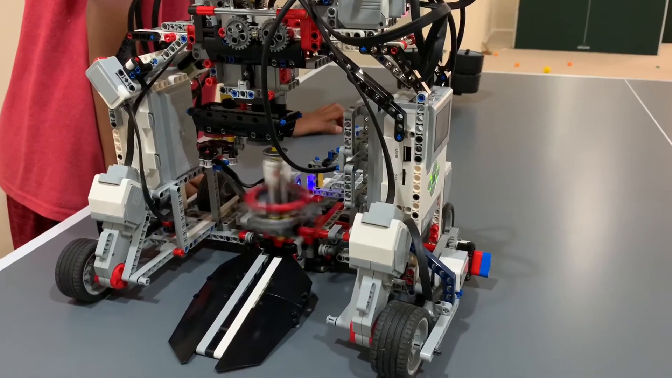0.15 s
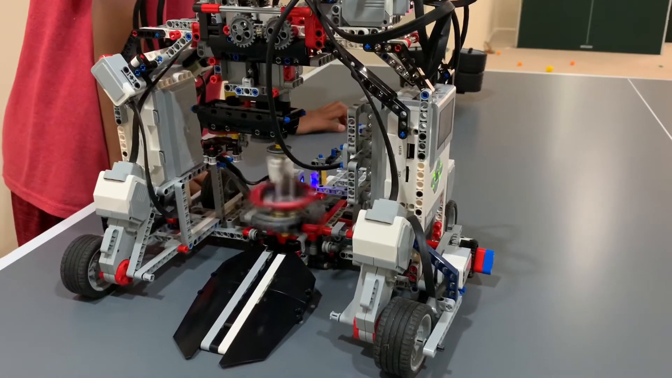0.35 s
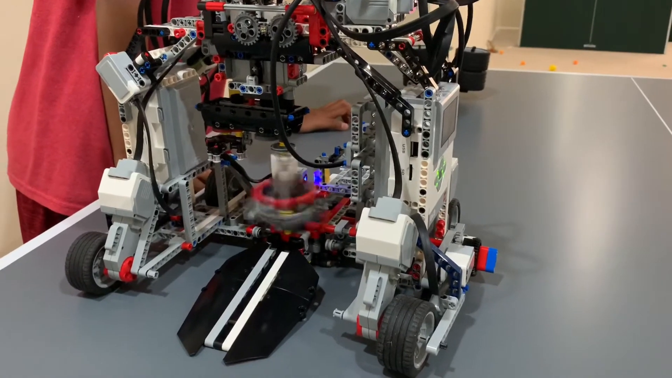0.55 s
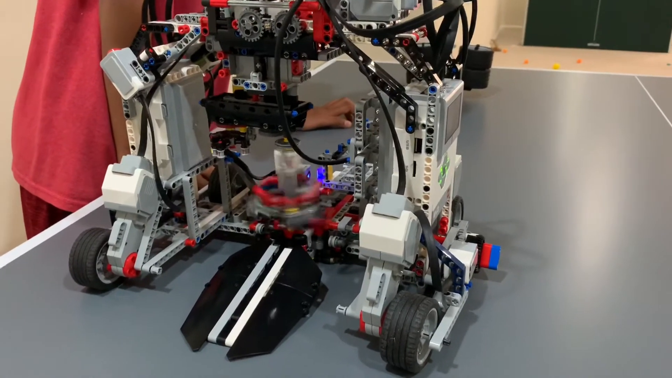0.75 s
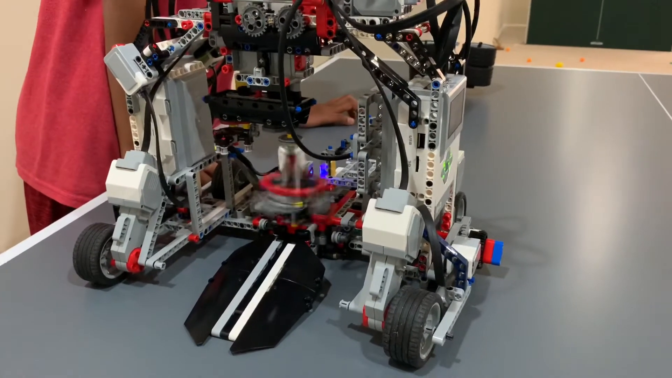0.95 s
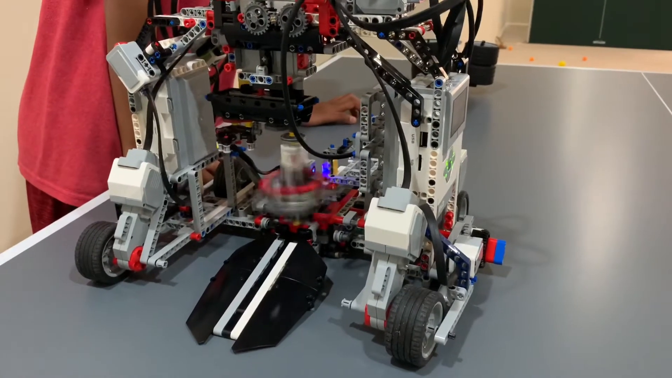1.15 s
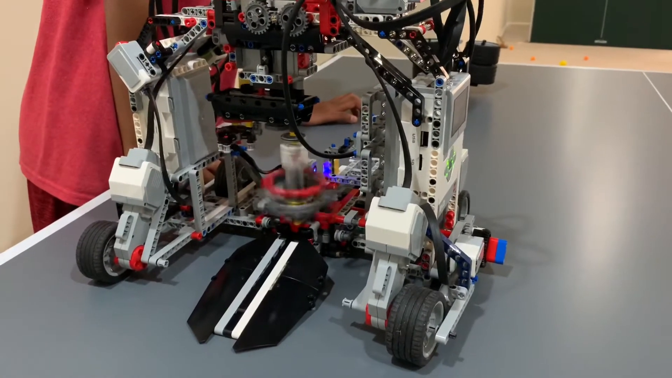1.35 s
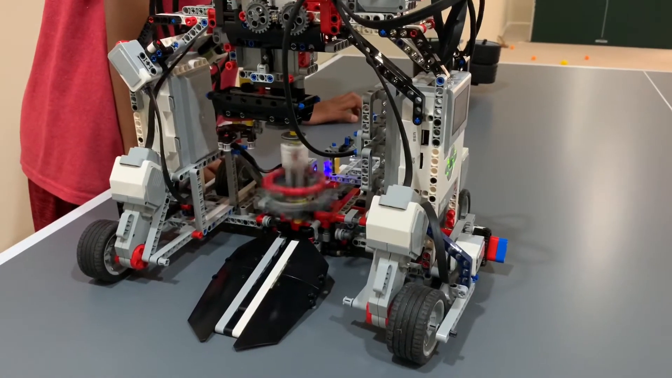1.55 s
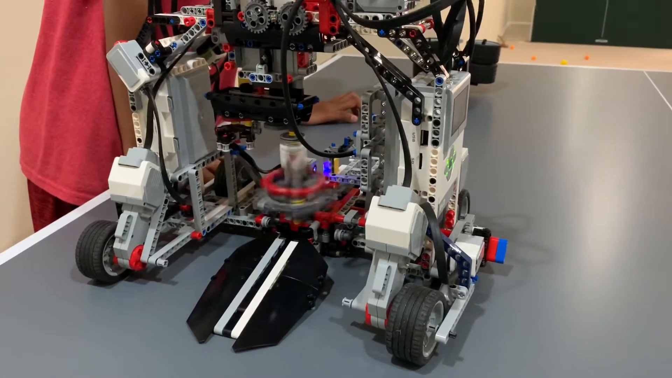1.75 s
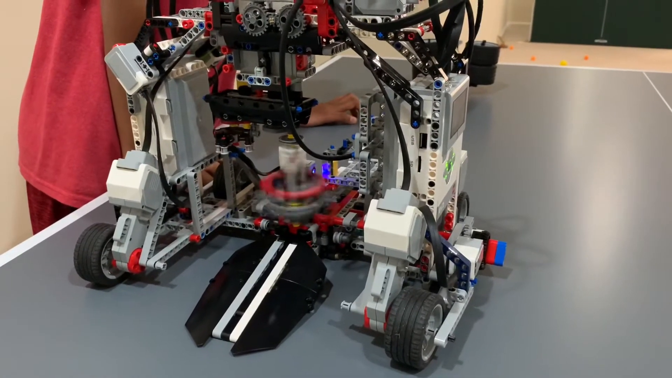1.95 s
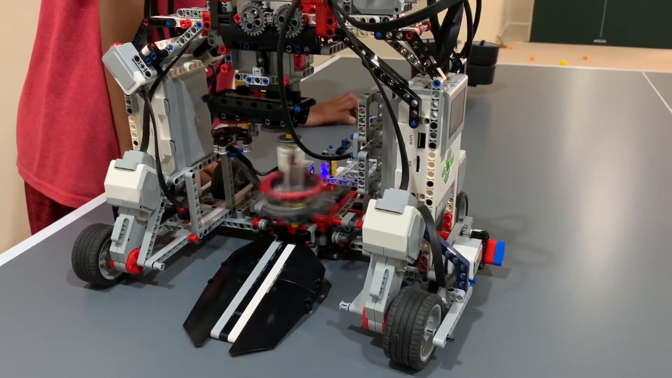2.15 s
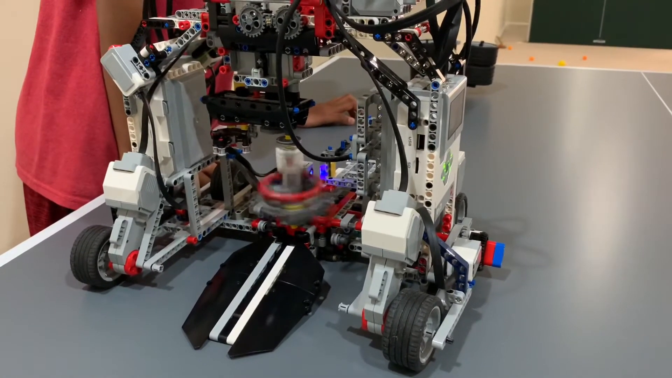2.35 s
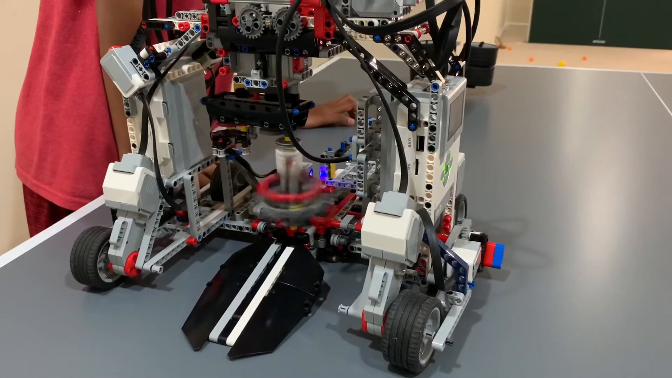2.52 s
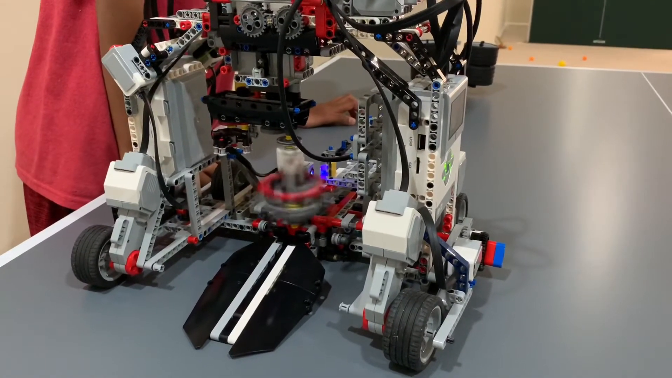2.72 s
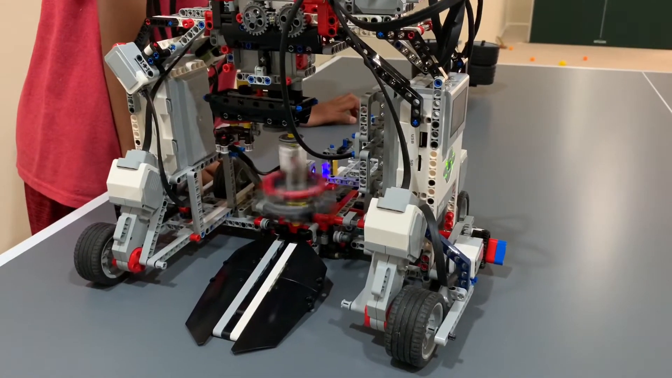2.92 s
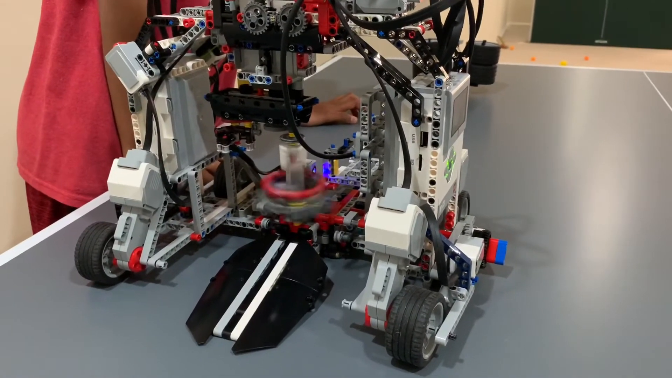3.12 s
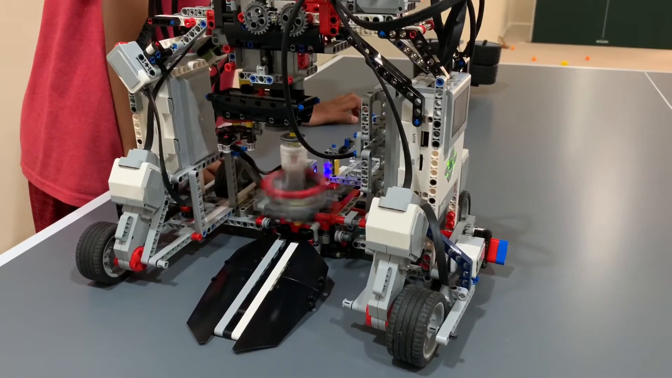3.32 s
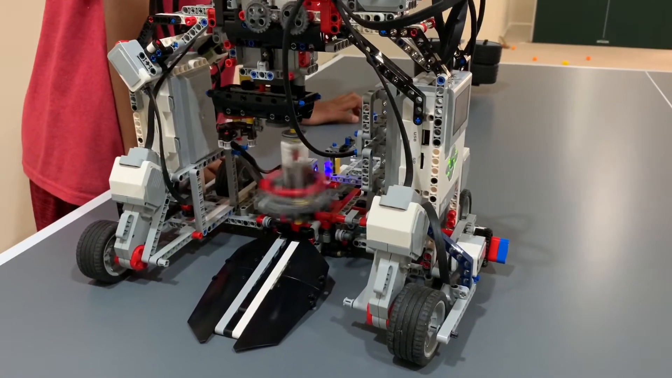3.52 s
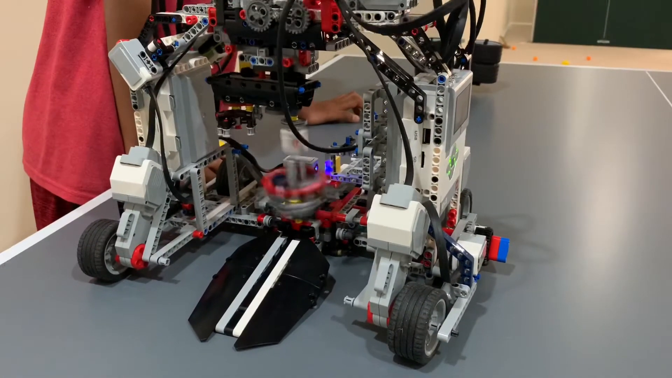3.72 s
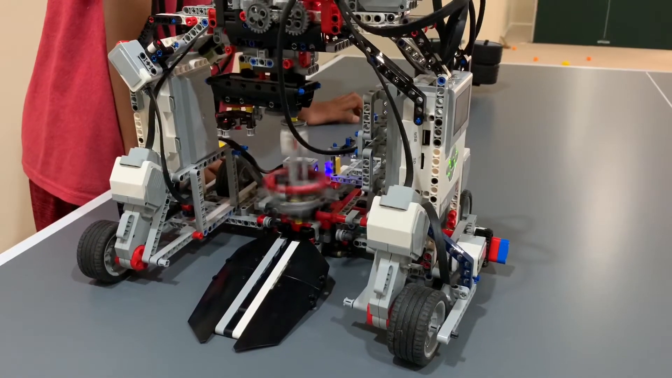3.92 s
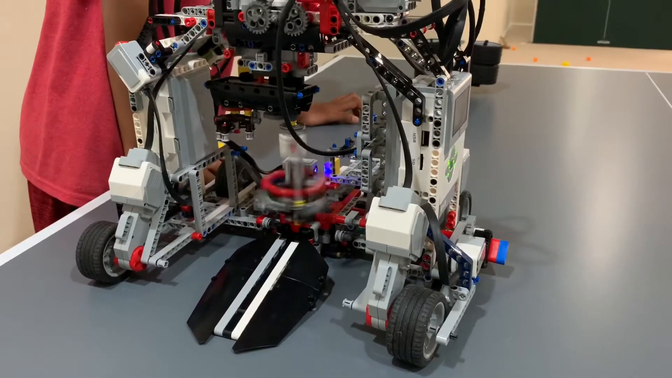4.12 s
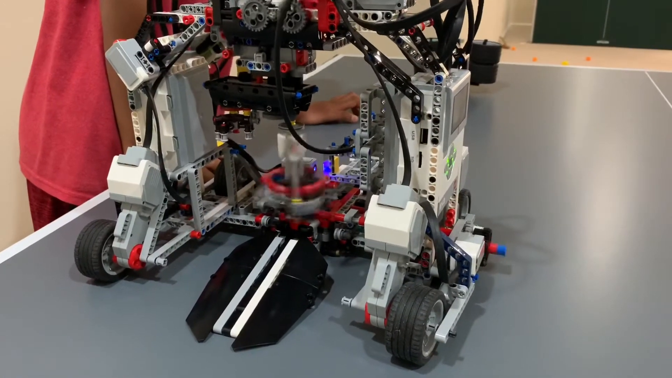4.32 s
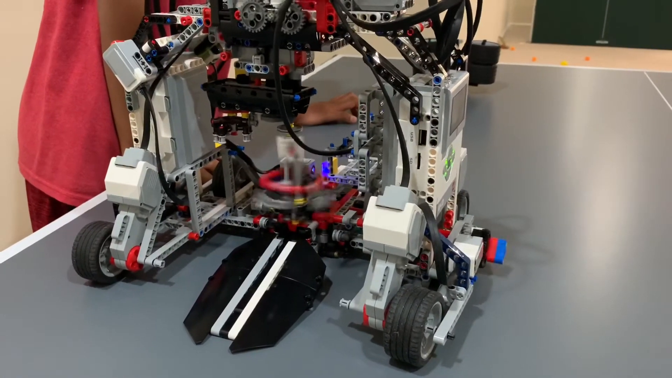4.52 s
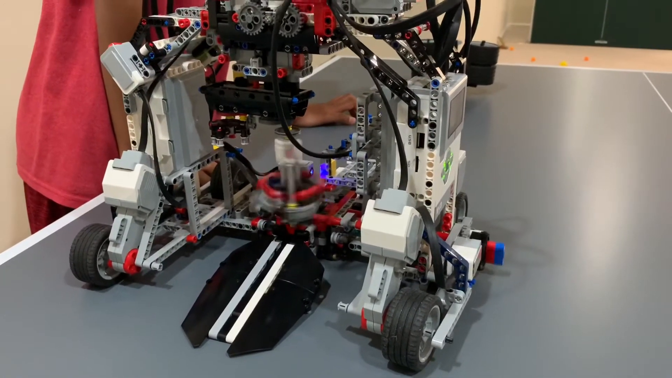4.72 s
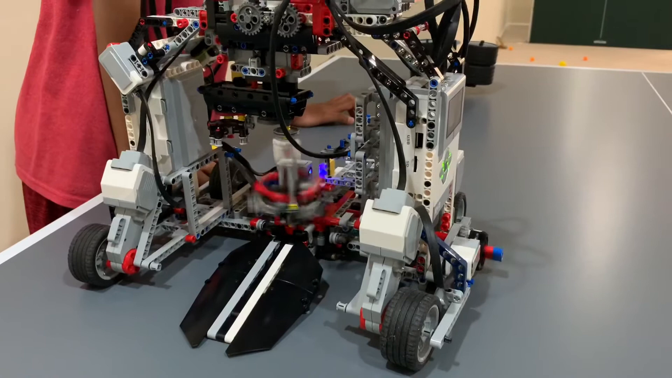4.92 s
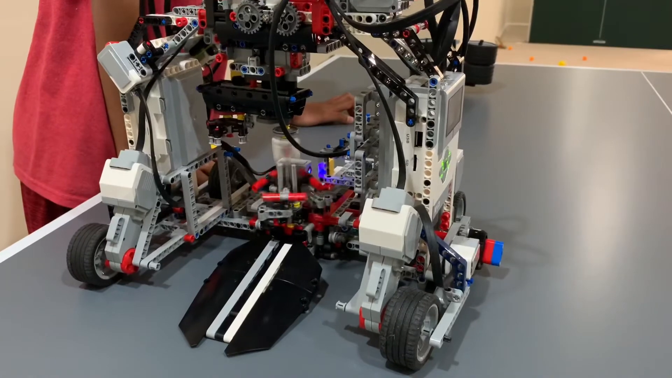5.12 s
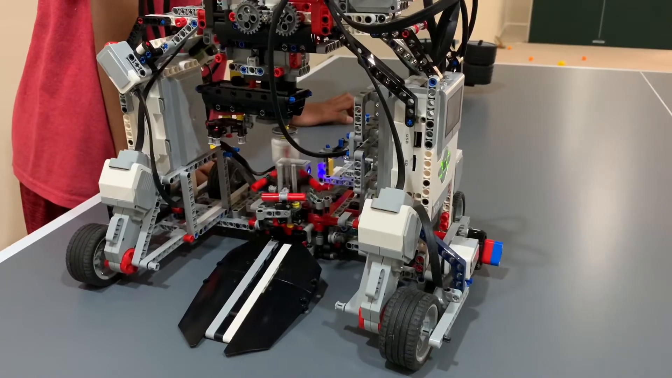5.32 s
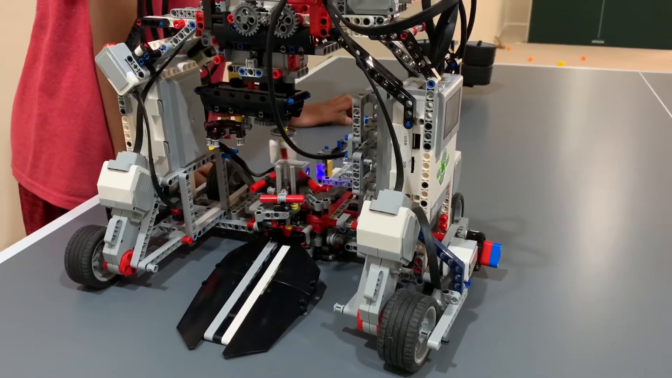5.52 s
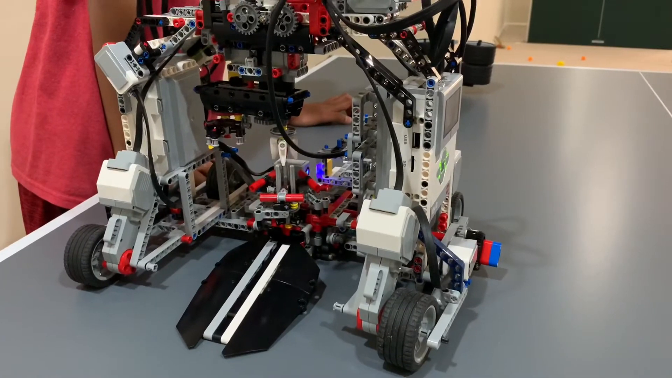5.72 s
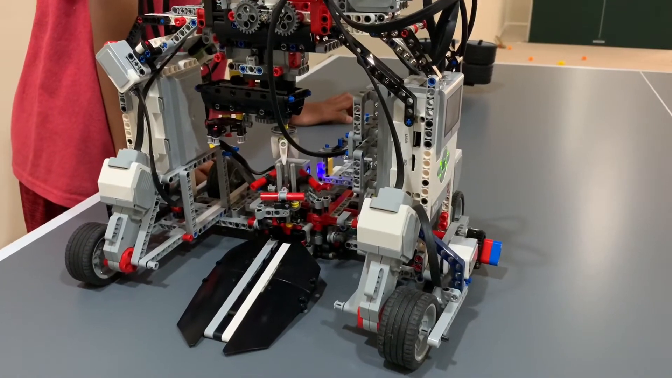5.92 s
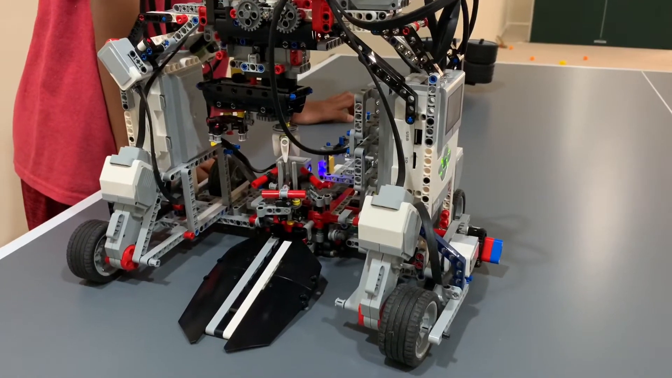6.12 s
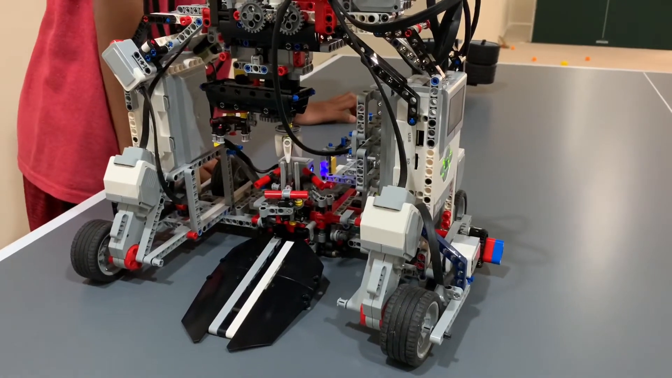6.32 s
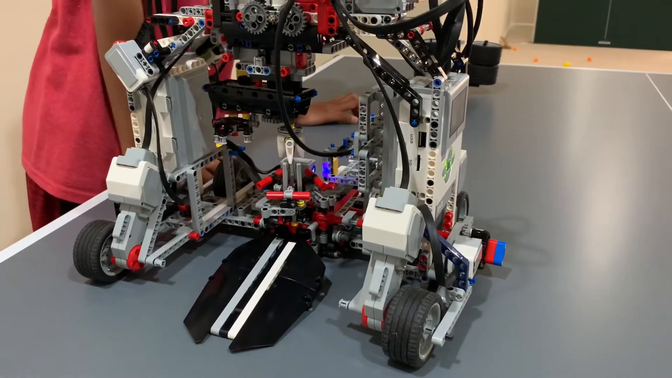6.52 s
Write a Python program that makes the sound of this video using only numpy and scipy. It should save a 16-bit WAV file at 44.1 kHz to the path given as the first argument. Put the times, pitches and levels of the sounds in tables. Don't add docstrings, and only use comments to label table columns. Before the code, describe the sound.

Small geared motors whir and hiss with a thin rising whine, click lightly, then clatter in a quickening rattle before running down into quiet room hum.

```python
import sys
import numpy as np
from scipy import signal
from scipy.fft import rfft, irfft, next_fast_len
from scipy.io import wavfile
from scipy.ndimage import uniform_filter1d, minimum_filter1d

SR = 44100
rng = np.random.default_rng(int(sys.argv[2]) if len(sys.argv) > 2 else 0)


def volts_from_decibels(level):
    exponent = np.asarray(level, float) / 20
    return 10 ** exponent


def put_to_file(sound):
    columns = np.atleast_2d(sound).T
    safe = np.clip(columns, -1, 1)
    whole_steps = np.round(safe * 32767)
    wavfile.write(sys.argv[1], SR, whole_steps.astype(np.int16))


N = 289501
T = np.arange(N) / SR


def unit(x):
    return x / np.sqrt(np.mean(x ** 2) + 1e-20)


def along(points, hz):
    f, v = np.transpose(points)
    return np.interp(np.log(hz + 1), np.log(f + 1), v)


def curves(rows):
    s, *cols = np.transpose(rows)
    return [np.interp(T, s, c) for c in cols]


def wobble(rate):
    count = int(N * rate / SR) + 2
    return np.interp(T * rate, np.arange(count), rng.standard_normal(count))


def filtered(x, response):
    m = next_fast_len(N + 4096, True)
    return irfft(rfft(x, m) * response(np.fft.rfftfreq(m, 1 / SR)), m)[..., :N]


def modes(table):
    def response(f):
        total = 0
        for k, (centre, width, db) in enumerate(table):
            total = total + (-1) ** k * volts_from_decibels(db) * 1j * f * width / (centre * centre - f * f + 1j * f * width)
        return total
    return response


def coloured(x, spectrum):
    hz = np.linspace(0, SR / 2, 2000)
    power = np.mean(volts_from_decibels(along(spectrum, hz)) ** 2)
    return filtered(x, lambda f: volts_from_decibels(along(spectrum, f))) / np.sqrt(power)


def tone(hz, spread_hz, broken_db=13.0):
    strength = volts_from_decibels(broken_db * wobble(30))
    cycles = np.cumsum(hz + 1.5 * spread_hz * wobble(40)) / SR
    return unit(strength * np.sin(2 * np.pi * cycles))


def grit(rough_db):
    drift_db = .7 * wobble(14)
    return unit(volts_from_decibels(rough_db * wobble(700) + drift_db) * rng.standard_normal((2, N)))


def ports(pair, alike, lead):
    # (frequency [Hz], left minus right level [dB])
    tilt = [(60, 4), (110, -5), (200, 2), (380, 2), (700, 2.5), (1290, 3), (2380, -1), (4400, -3.5),
            (8120, 0.5), (15000, 0.5)]

    def response(hz):
        turn = np.arccos(np.clip(along(alike, hz), -1, 1)) / 2
        half = np.exp(.5j * np.interp(hz, *np.transpose(lead))) * volts_from_decibels(along(tilt, hz) / 2)
        left = [np.cos(turn) * half, np.sin(turn) * half]
        right = [np.cos(turn) / half, -np.sin(turn) / half]
        return np.array([left, right])
    return filtered(pair[None], response).sum(axis=1)


def air():
    # (frequency [Hz], density [dB per Hz])
    air_spectrum = [(13, -60), (25, -16), (42, -20), (62, -1.5), (90, -10), (200, -8.5), (280, -15.5),
                    (500, -27), (1000, -29), (1600, -36), (2500, -43.5), (5000, -55.5), (8500, -62.5),
                    (10500, -59), (11700, -61), (13000, -99)]
    # (frequency [Hz], coherence [0-1])
    air_alike = [(60, .92), (340, .85), (860, .3), (1500, .15), (7000, .15), (8600, .9), (10500, .5)]
    # (frequency [Hz], left lead [rad])
    air_lead = [(0, 0), (5000, 0), (7600, .8), (8600, 3.14), (9800, 5.7), (12000, 6.3)]
    # (frequency [Hz], level [dB], unsteadiness [Hz])
    mains = [(120.2, -54, 2.856), (180, -64, 6.8), (66.7, -76, 9.6)]
    # (time [s], level [dB])
    sleeve = [(6.36, -100), (6.44, -85), (6.5, -70), (6.56, -67)]
    # (frequency [Hz], density [dB per Hz])
    cloth = [(800, -23), (1600, 13.5), (4500, 2.5), (7000, -7.5), (11500, -8.5), (12500, -34.5)]
    # (time [s], frequency [Hz], level [dB], t60 [s])
    bumps = [
        (0.798, 179.8, -40.5, 0.65),
        (.9, 69.64, -51, 0.22),
        (0.917, 282, -43.5, 0.11),
        (1.133, 299.4, -38, 0.061),
        (4.23, 180, -41, 0.45),
        (4.548, 174.6, -46, 0.98),
        (6.262, 197.4, -44, 0.069),
    ]
    rumble = volts_from_decibels(-49.5) * unit(coloured(rng.standard_normal((2, N)), air_spectrum))
    gusts = volts_from_decibels(0.64 * wobble(5.8)) - 1
    rumble = rumble + gusts * uniform_filter1d(rumble, size=40)
    rumble = rumble + volts_from_decibels(curves(sleeve)[0]) * coloured(rng.standard_normal((2, N)), cloth)
    hum = sum(volts_from_decibels(db) * tone(hz + 0 * T, spread, broken_db=-1.8) for hz, db, spread in mains)
    for s, hz, db, t60 in bumps:
        start = round(s * SR)
        age = T[:min(SR // 3, N - start)]
        swell = np.minimum(age / 0.007, 1)
        hum[start:][:len(age)] += volts_from_decibels(db - 60 * age / t60) * swell * np.sin(2 * np.pi * hz * age)
    whistle = volts_from_decibels(-78.5) * np.sin(2 * np.pi * 13230 * T) * [[1], [-1]]
    return ports(rumble, air_alike, air_lead) + hum + whistle


def room(x):
    # (frequency [Hz], t60 [s])
    decay = [(300, 0.19), (2000, 0.64), (8000, 0.0221), (16000, 0.014)]
    hz, t, z = signal.stft(rng.standard_normal((2, SR // 3)), SR, nperseg=256)
    tail = signal.istft(z * volts_from_decibels(-60 * t / along(decay, hz)[:, None]), SR, nperseg=256)[1]
    delayed = np.pad(x, ((0, 0), (150, 0)))
    return signal.oaconvolve(delayed, tail / np.linalg.norm(tail[0]), axes=1)[:, :N]


def knocks():
    # (time [s], frequency [Hz], level [dB])
    box_rings = [(4.163, 820, -35), (4.163, 1450, -34), (4.231, 630, -36.5), (4.231, 1554, -32.5),
                 (4.286, 630, -38), (4.286, 980, -37), (4.286, 1477, -33), (4.336, 612, -35),
                 (4.336, 840, -39), (4.336, 1430, -35), (4.385, 630, -34.5), (4.385, 1610, -35.5),
                 (4.419, 603, -41), (4.44, 853, -44), (4.552, 583, -46), (4.586, 852, -41.5)]
    rise_s, t60 = .003, .075
    box, age = np.zeros(N), T[:SR // 5]
    shape_db, swell = -60 * age / t60, np.minimum(age / rise_s, 1)
    for s, hz, db in box_rings:
        box[round(s * SR):][:len(age)] += volts_from_decibels(db + shape_db) * swell * np.sin(2 * np.pi * hz * age)
    return box * [[1], [0]]


def contacts(events, colour, scrape, t60, tail_db, tail_t60, frame_db, lumpy_db):
    # (frequency [Hz], width [Hz], level [dB])
    frame = [(690, 860, 0.5), (1500, 930, 8.5), (2470, 1400, 6), (3044, 1300, -5.5)]
    lead_in_s = .003
    crack, thump = np.zeros((2, N + 4096)), np.zeros((2, N + 4096))
    t = np.arange(4096) / SR - lead_in_s
    after = np.maximum(t - abs(scrape), 0)
    swell = volts_from_decibels(60 * np.minimum(t, 0) / 0.0046)
    shape = swell * (volts_from_decibels(-60 * after / t60) + volts_from_decibels(tail_db - 60 * after / tail_t60))
    for s, db, thump_db in events:
        lumps = volts_from_decibels(lumpy_db * np.repeat(rng.standard_normal(128), 32))
        burst = shape * lumps * rng.standard_normal((2, 4096))
        burst = burst * np.linalg.norm(shape) / np.linalg.norm(burst, axis=1, keepdims=True)
        start = round((s - lead_in_s) * SR)
        crack[:, start:][:, :4096] += volts_from_decibels(db) * burst
        thump[:, start:][:, :4096] += volts_from_decibels(thump_db + frame_db) * burst
    return coloured(crack[:, :N], colour) + filtered(thump[:, :N], modes(frame))


def clatter():
    # (time [s], peak [dB], frame thump [dB])
    snap_events = [(.738, -23, -66), (.7401, -28, -59), (.7439, -19, -66), (.7511, -31, -64),
                   (.766, -37, -67), (.7729, -23, -69), (.7885, -19.5, -59), (.8039, -32, -51.5),
                   (.8195, -36, -61), (.833, -20.5, -56), (.8396, -30, -47), (.8477, -18.5, -63),
                   (.8505, -23.5, -51), (.8658, -29, -51), (.9084, -21, -47), (.9175, -21.5, -48),
                   (.9201, -20.5, -56), (.9232, -28, -49), (.9276, -26, -49), (1.1247, -25, -45.5),
                   (1.1325, -19.5, -46), (1.1352, -26, -43.5), (1.1401, -27, -56), (1.1438, -28, -57),
                   (1.2275, -30.5, -47), (4.2049, -29.5, -48.5)]
    # (time [s], peak [dB],
    # frame thump [dB])
    rub_events = [(.6106, -35, -54), (.6146, -31, -51), (.6265, -38, -56.5), (.6805, -34, -49.5),
                  (.6874, -31, -45), (.7024, -37, -52), (.7222, -35, -62), (.7289, -37, -49),
                  (3.4643, -30, -47.5), (3.5151, -27.5, -54), (3.5265, -29, -56), (3.5572, -31, -51.5),
                  (3.6162, -33, -48)]
    # (time [s], peak [dB], frame thump [dB])
    blow_events = [
        (4.1631, -8.5, -29.5),
        (4.2304, -8, -30),
        (4.2853, -10, -31.5),
        (4.3353, -13, -31),
        (4.3839, -11.5, -30),
        (4.4183, -11.5, -41),
        (4.5514, -10.5, -55),
    ]
    slip_times = [4.438, 4.473, 4.5127, 4.5829, 4.6154, 4.6514, 4.6829, 4.714, 4.744, 4.7726, 4.803, 4.8287,
                  4.859]
    # (time [s], peak [dB])
    tooth_events = [(4.395, -21.5), (4.4388, -18), (4.4447, -23.5), (4.4764, -18), (4.4819, -20),
                    (4.5132, -21), (4.5169, -19), (4.5224, -22.5), (4.5573, -20), (4.5848, -15.5),
                    (4.592, -18.5), (4.6172, -15), (4.6234, -22), (4.652, -20), (4.6546, -16.5),
                    (4.6589, -21), (4.684, -19), (4.687, -19.5), (4.691, -21.5), (4.7149, -20),
                    (4.7194, -19), (4.7225, -22.5), (4.7453, -21.5), (4.75, -23), (4.7743, -23),
                    (4.7787, -18), (4.8053, -23), (4.8077, -22), (4.813, -22.5)]
    # (frequency [Hz], density [dB per Hz])
    snap_colour = [(2000, -24), (5000, -9.5), (7000, -5), (10000, -4), (12200, 2), (13500, -5), (14800, -1),
                   (16100, -9.5), (16500, -42.5), (16900, -42)]
    rub_colour = [(1500, -17.5), (3000, -9.5), (5500, -4), (7000, -1.5), (10000, 0), (13000, 0),
                  (16000, -18), (16600, -44)]
    clack_colour = [(1500, -26), (2800, -11), (4500, -9.5), (6300, -14), (7200, -2.5), (8500, -4),
                    (9900, -5.5), (11000, -3.5), (12200, -2), (13500, -9.5), (15000, 0.5), (16100, -16.5),
                    (16500, -34), (16900, -40)]
    tooth_colour = [(1500, -21), (3000, -10.5), (5000, -5.5), (7200, -1.5), (9000, 0), (11000, -3.5),
                    (15000, -1.5), (16100, -27), (16500, -40.5)]
    slips = [(s, -31.5 - 126 * (s - 4.52) ** 2, -46.5) for s in slip_times]
    teeth = [(s, db - 4.0, db - 37.0) for s, db in tooth_events]
    snaps = contacts(snap_events, snap_colour, scrape=.0007, t60=0.01104, tail_db=-31.5,
                     tail_t60=0.0409, frame_db=12, lumpy_db=3.0)
    rubs = contacts(rub_events, rub_colour, scrape=.0007, t60=0.028, tail_db=-25,
                    tail_t60=0.044, frame_db=8, lumpy_db=2.0)
    blows = contacts(blow_events, clack_colour, scrape=.0004, t60=0.006, tail_db=-19,
                     tail_t60=0.05, frame_db=8, lumpy_db=1.5)
    caught = contacts(teeth, tooth_colour, scrape=.0007, t60=.013, tail_db=-20,
                      tail_t60=.03, frame_db=12, lumpy_db=1.2)
    scrapes = contacts(slips, tooth_colour, scrape=.009, t60=.012, tail_db=-22.5,
                       tail_t60=.04, frame_db=8.5, lumpy_db=4.5)
    return snaps + rubs + blows + caught + scrapes


def lift():
    # (start [s], stop [s], level at start [dB], level at stop [dB])
    surges = [
        (3.477, 3.752, -41.5, -52.5),
        (4.033, 5.018, -51.5, -43),
    ]
    # (frequency [Hz], density [dB per Hz])
    surge_hiss = [
        [(300, -30), (700, -9), (1500, -8), (2300, -9), (3500, -5), (5500, -4), (7300, -4), (8200, -6),
         (11000, 2), (13000, -4), (14500, -10), (15900, -10)],
        [(300, -30), (700, -11), (1500, -7), (2300, -6), (3700, -2), (5500, -3), (7300, -3), (8400, -5),
         (11000, -3), (14500, -9), (15900, -12)],
    ]
    # (start [s], stop [s], frequency [Hz], level [dB], fade [dB per s])
    strain = [
        (3.485, 3.666, 1636, -48.5, 16),
        (4.866, 4.974, 1010, -49, 32),
        (4.868, 4.975, 1983, -48.5, 21.5),
    ]
    fade_s, release_s, edge_s, sag = .04, 0.092, .06, .2
    sound = np.zeros((2, N))
    for (start, stop, start_db, stop_db), hiss in zip(surges, surge_hiss):
        level_db = np.interp(T, [start, stop], [start_db, stop_db])
        fade = np.clip(np.minimum((T - start) / fade_s, (stop - T) / release_s), 0, 1)
        hum = volts_from_decibels(-9.0) * tone(135 + 0 * T, 9.8)
        gears = volts_from_decibels(7.5) * unit(coloured(grit(rough_db=3.0), hiss))
        sound += fade * volts_from_decibels(level_db) * (gears + hum)
    for start, stop, hz, db, fade_db in strain:
        edge = np.clip(np.minimum(T - start, stop - T) / edge_s, 0, 1)
        pitch = hz * (1 - sag * ((stop - start) / 0.21) ** 2 * (1 - edge) ** 2)
        level = np.minimum(6 * edge, 1) * volts_from_decibels(db - fade_db * np.clip(T - start, 0, 1))
        sound += level * tone(pitch, 18, broken_db=-0.5)
    return sound


def spinner():
    # (time [s], level [dB], whine [Hz])
    spin = [(0, -48, 1253), (.2, -46.5, 1385), (.33, -47, 1419), (.47, -46.5, 1590), (.58, -45.5, 1632),
            (.67, -46.5, 1500), (.83, -41.5, 1720), (.96, -47.5, 1395), (1.22, -42, 1553), (1.3, -47, 1503),
            (1.45, -45.5, 1838), (3.4, -47.5, 1900), (3.55, -43.5, 1915), (3.68, -46, 1947),
            (3.76, -70, 1960)]
    # (frequency [Hz], density [dB per Hz])
    spin_hiss = [(400, -15.5), (1000, -24), (2400, -17.5), (2850, 2), (3400, -14), (6300, -5.5), (7400, 2),
                 (8200, -6), (9000, -1), (10000, 0), (11400, -7), (12300, -0.5), (14300, -4.5),
                 (15800, -4.5)]
    level_db, whine_hz = curves(spin)
    on = T < spin[-1][0]
    turns = np.cumsum(whine_hz / 61) / SR
    throb = volts_from_decibels(0.66 * np.cos(2 * np.pi * turns) + 0.56 * np.cos(7 * np.pi * turns))
    hiss = unit(coloured(throb * grit(rough_db=2.5), spin_hiss))
    size = volts_from_decibels(2 * rng.standard_normal(int(turns[-1]) + 1))[turns.astype(int)]
    strike = size * volts_from_decibels(-60 * (turns % 1) / 0.23) * rng.standard_normal((2, N))
    tick_modes = modes([(12400, 660, 8.0), (13700, 1200, -3.5), (9460, 1300, -37.0)])
    ticks = unit(filtered(strike, tick_modes))
    ticking = (T > 1.3) * (T < 3.55)
    gears = volts_from_decibels(level_db + 7.5) * (hiss + volts_from_decibels(-6.5) * ticking * ticks)
    whine = tone(whine_hz, 30, broken_db=2.5) + volts_from_decibels(-4) * tone(2 * whine_hz, 40, broken_db=4)
    shell = 1 / (1 + ((whine_hz - 1620) / 240) ** 2)
    whine_db = -55.5 - 9 * np.clip(T - .58, 0, 1)
    return on * (gears + volts_from_decibels(whine_db) * shell * whine)


def idle_motor():
    # (time [s], level [dB])
    idle = [(0, -45), (.5, -40.5), (3.45, -37), (3.72, -39), (4.2, -39), (4.9, -36), (5.05, -39),
            (5.36, -39.5)]
    # (frequency [Hz], width [Hz], level [dB])
    housing = [(750, 550, -17.5), (1900, 820, -14.5), (3106, 740, -1), (5600, 10000, -10), (7150, 236, 0),
               (9050, 450, 1.5), (11060, 560, 0.5), (13150, 800, -.5), (16000, 1400, -15)]
    # (frequency [Hz], level over the motor [dB], unsteadiness [Hz])
    gear_tones = [(1453, -30, 12)]
    # (frequency [Hz], level over the motor [dB], unsteadiness [Hz])
    rings = [(1995, -27, 16), (2550, -33, 30), (3900, -19.5, 35)]
    coast = np.maximum(T - 5.33, 0)
    level_db = curves(idle)[0] - 3600 * coast ** 3
    speed = np.interp(T, (3.45, 3.72), (1, .916))
    speed = np.maximum(speed - 0.24 * coast, .5)
    load = np.clip(1 - speed, 0, .085) / .085
    tones = sum(volts_from_decibels(db) * tone(hz * speed, spread, 6.8) for hz, db, spread in gear_tones)
    tones = tones + sum(volts_from_decibels(db) * tone(hz + 0 * T, spread, 3.8) for hz, db, spread in rings)
    squeal = volts_from_decibels(-27 + 16 * load) * tone(10560 + 0 * T, 30, 2)
    tones = volts_from_decibels(3 * load) * tones + squeal
    tones = tones * volts_from_decibels(-70 * coast)
    return volts_from_decibels(level_db) * (unit(filtered(grit(rough_db=1.5), modes(housing))) + tones)


def scene():
    # (frequency [Hz], left lead [rad])
    motor_lead = [(100, 0), (1000, .6), (1800, 2.1), (2400, 1.6), (2900, 2.95), (3350, 3.35), (3750, 4.5),
                  (4400, 5.8), (5900, 6.3), (6700, 5.9), (8000, 3.5), (9100, 2.9), (10200, .4),
                  (11600, -.3), (12800, -2.8), (14300, -3.5), (15200, -6)]
    hit_lead = [(100, 0), (1200, .5), (1900, -.2), (3100, 1.5), (5500, 2.9), (6200, 6), (10850, 0),
                (15750, -6.3)]
    # (frequency [Hz], coherence [0-1])
    motor_alike = [(300, .88), (1000, .68), (2000, .3), (2900, .67), (3300, .69), (3800, .35), (4800, .15),
                   (6500, .8), (7500, .75), (8500, .95), (9700, .7), (11000, .95), (12100, .72),
                   (13500, .97), (14800, .55), (15500, .93)]
    hit_alike = [(300, .9), (1000, .75), (1900, .35), (3000, .55), (6000, .3), (7000, .65), (8300, .85),
                 (9400, .7), (11300, .9), (12400, .6), (13400, .9), (14500, .7), (16000, .8)]
    # (time [s], share)
    ring_alike = [(0, .25), (.1, .4), (.38, .35), (.45, .1), (.56, .45), (.66, .2), (.75, 0), (.95, .3),
                  (1.15, .12), (3.4, .1), (3.55, 0), (3.8, .3), (4.05, .1), (4.15, -.1), (5.6, -.12)]
    hits = clatter()
    motors = idle_motor() + spinner() + lift()
    motors = motors + room(volts_from_decibels(-9.5) * motors + volts_from_decibels(-5.5) * hits)
    motors = filtered(motors, lambda hz: np.clip((15800 - hz) / 120, 0, 1))
    ring = filtered(motors[1], lambda hz: np.exp(-((hz - 3150) / 380) ** 4))
    motors = motors - curves(ring_alike)[0] * ring * [[0], [1]]
    clutch = ports(hits + knocks(), hit_alike, hit_lead)
    return ports(motors, motor_alike, motor_lead) + clutch + air()


def thrifty_stereo(x, under_db):
    band_edges = [96, 108, 120, 132, 144, 160, 176, 196, 216, 240, 264, 292, *range(320, 1024, 32)]
    sharp_peak = .13
    pair = np.pad([x[0] + x[1], x[0] - x[1]], ((0, 0), (485, 0)))
    z = signal.stft(pair, window="cosine", nperseg=2048)[2]
    power = np.add.reduceat(abs(z) ** 2, band_edges, axis=1)
    keep = power > volts_from_decibels(2 * under_db) * power[::-1]
    peak = -minimum_filter1d(-abs(pair).max(axis=0), size=1024)[::1024] / 2
    keep = keep | np.resize(peak > sharp_peak, z.shape[2])
    z[:, band_edges[0]:] *= np.repeat(keep, np.diff([*band_edges, z.shape[1]]), axis=1)
    mid, side = signal.istft(z, window="cosine", nperseg=2048)[1][:, 485:485 + N]
    return np.array([mid + side, mid - side]) / 2


def starved(x):
    # (frequency [Hz], level against the blow [dB])
    threshold = [(4000, -41), (7000, -32), (8600, -23), (10000, -26), (12000, -24), (13000, -18.5),
                 (17000, -18)]
    pair = np.pad([x[0] + x[1], x[0] - x[1]], ((0, 0), (933, 2048)))
    hz, _, z = signal.stft(pair, SR, window="cosine", nperseg=256)
    z = z[..., :z.shape[2] // 8 * 8]
    edges = np.arange(0, 129, 6)
    power = uniform_filter1d(np.add.reduceat(abs(z) ** 2, edges, axis=1), size=3, axis=2)
    blow = power.max(axis=0).reshape(len(edges), -1, 8).max(axis=2)
    blow = np.maximum(blow, volts_from_decibels(-9) * np.roll(blow, 1, axis=1))
    need_db = along(threshold, hz[edges])[:, None] + 2.5 * rng.standard_normal((2,) + blow.shape)
    keep = power > np.repeat(volts_from_decibels(2 * need_db) * blow, 8, axis=2)
    z = z * np.repeat(keep, np.diff([*edges, len(hz)]), axis=1)
    mid, side = signal.istft(z, window="cosine", nperseg=256)[1][:, 933:933 + N]
    return np.array([mid + side, mid - side]) / 2


def low_pass(x):
    return signal.sosfilt(signal.butter(12, 16970, fs=SR, output="sos"), x)


def record(dry):
    peak = .9
    limited = dry / (1 + abs(dry / peak) ** 4) ** .25
    mix = starved(thrifty_stereo(limited, under_db=-6.5))
    return low_pass(mix)


dry = scene()
out = record(dry)
put_to_file(out)
```